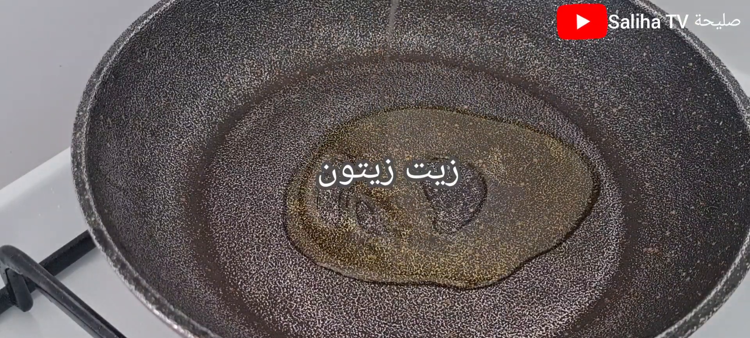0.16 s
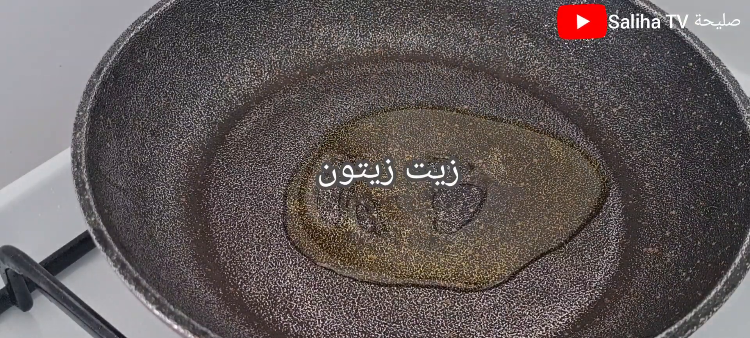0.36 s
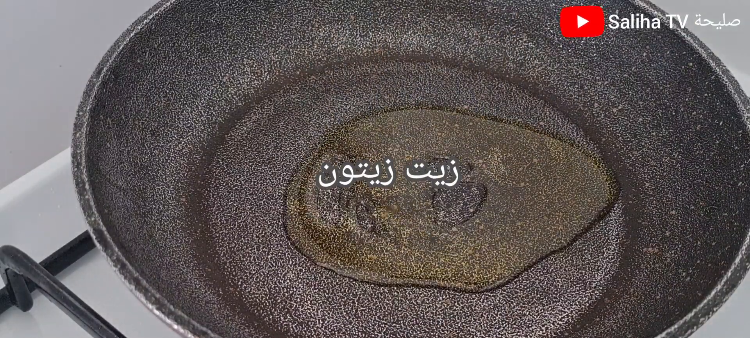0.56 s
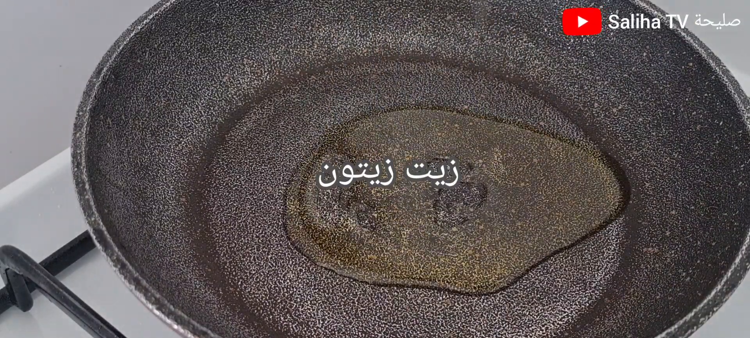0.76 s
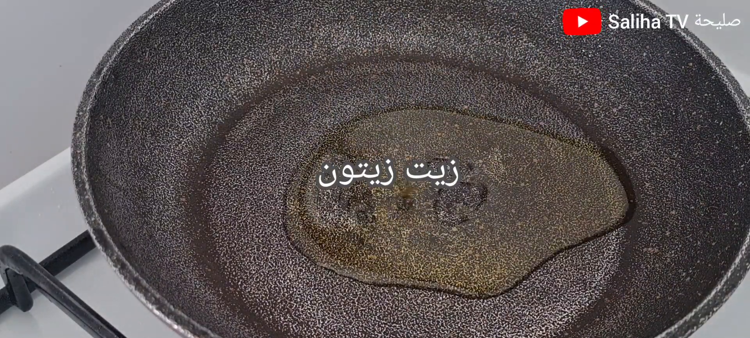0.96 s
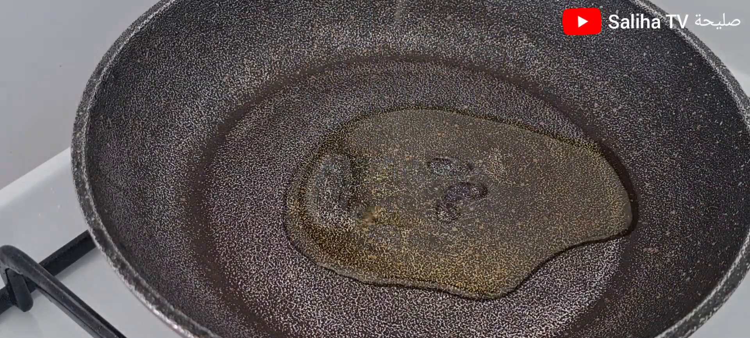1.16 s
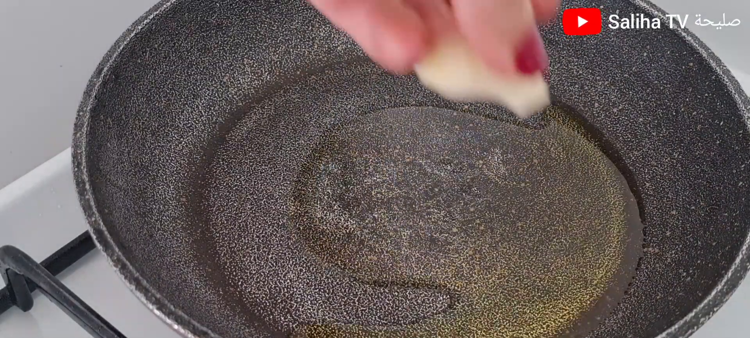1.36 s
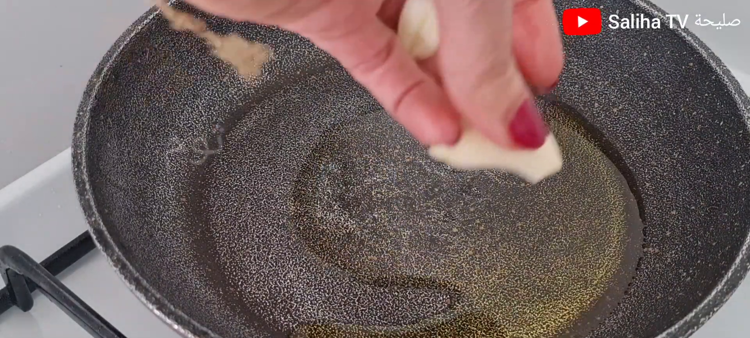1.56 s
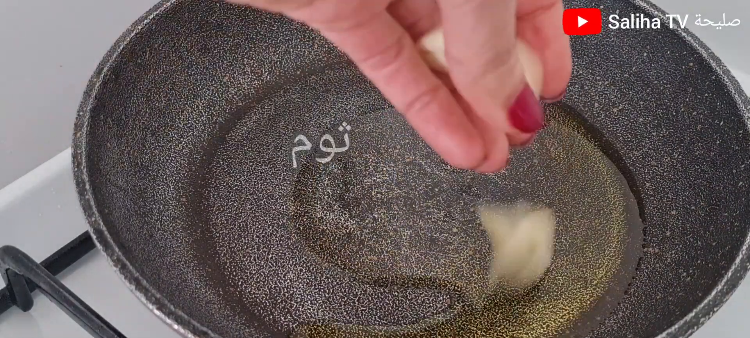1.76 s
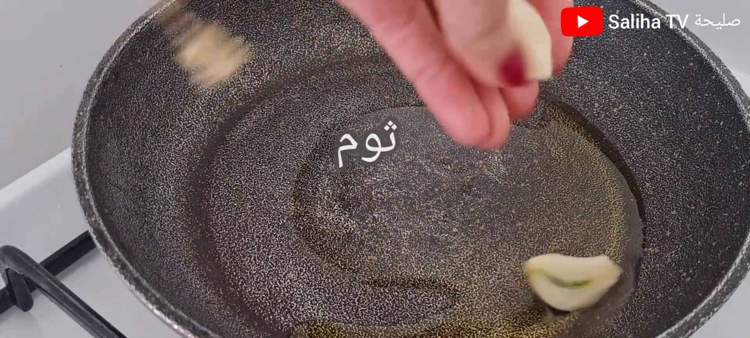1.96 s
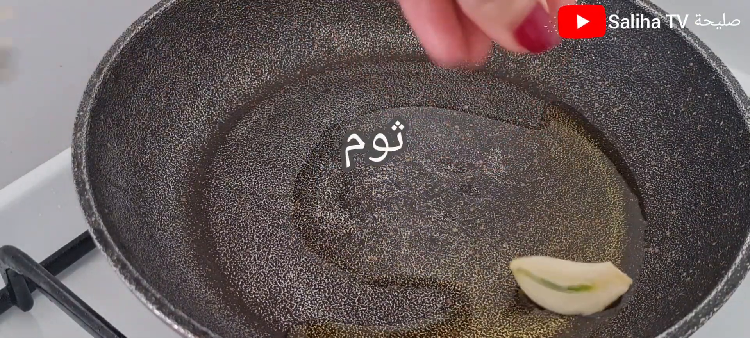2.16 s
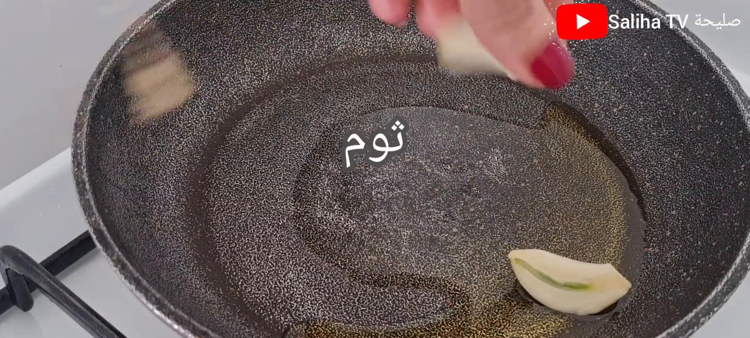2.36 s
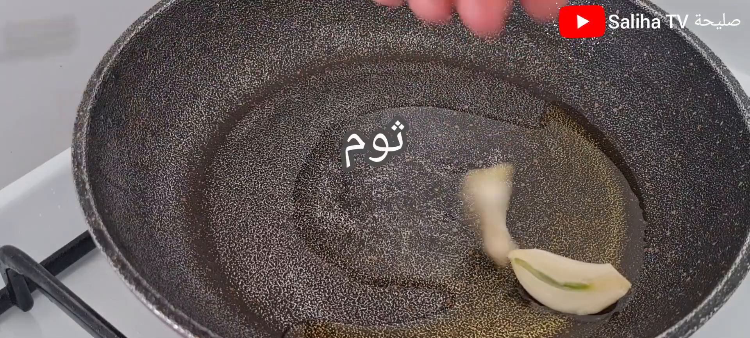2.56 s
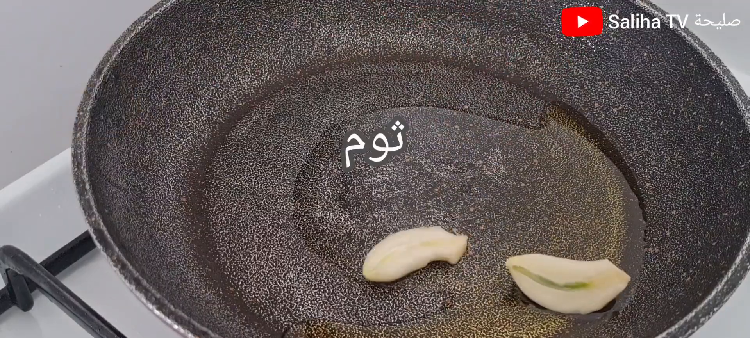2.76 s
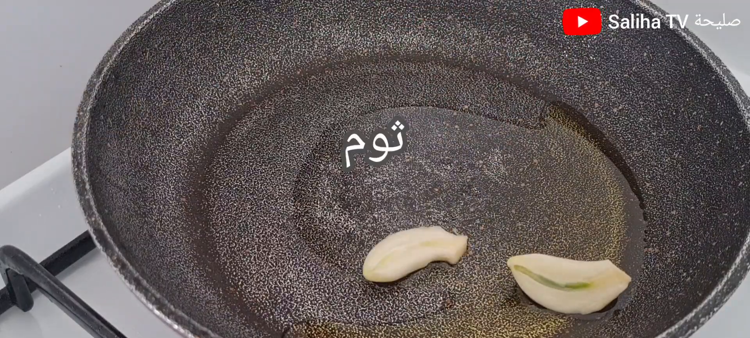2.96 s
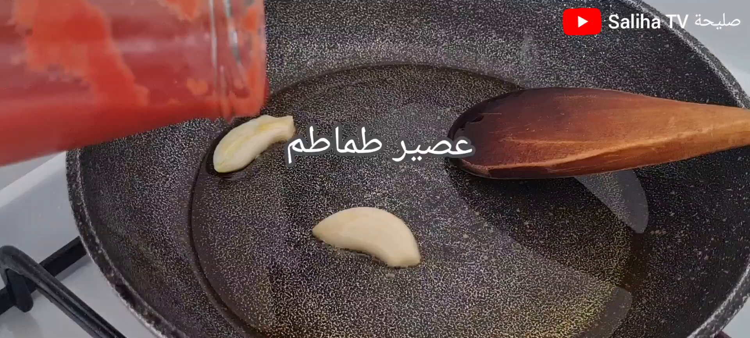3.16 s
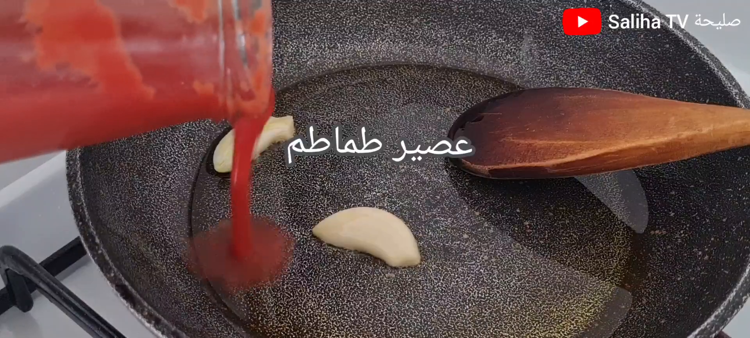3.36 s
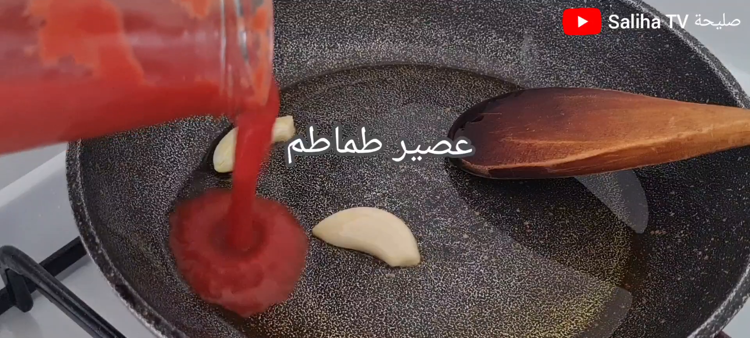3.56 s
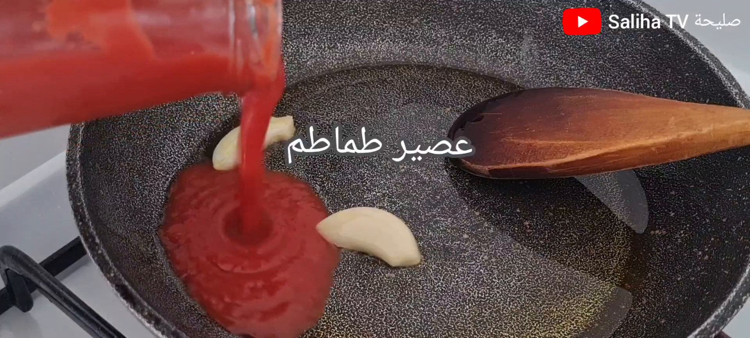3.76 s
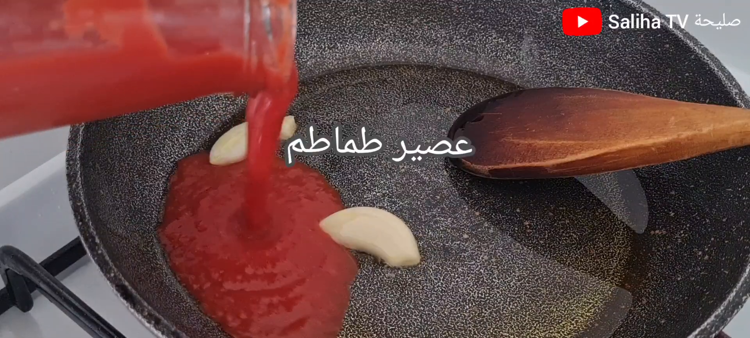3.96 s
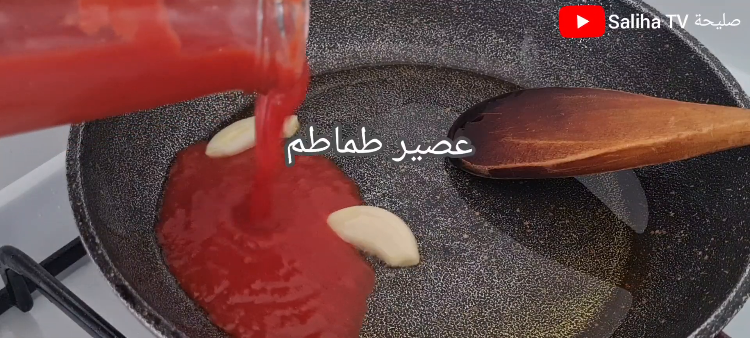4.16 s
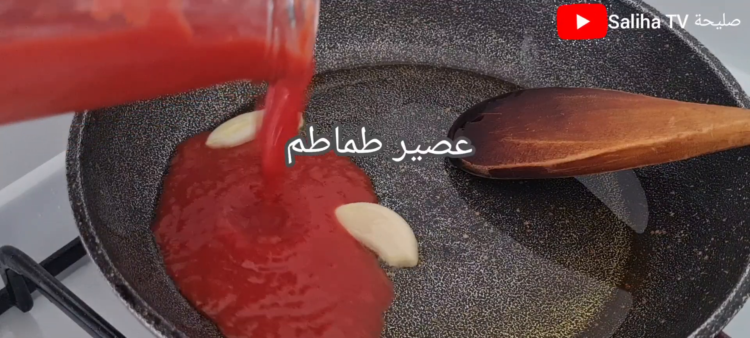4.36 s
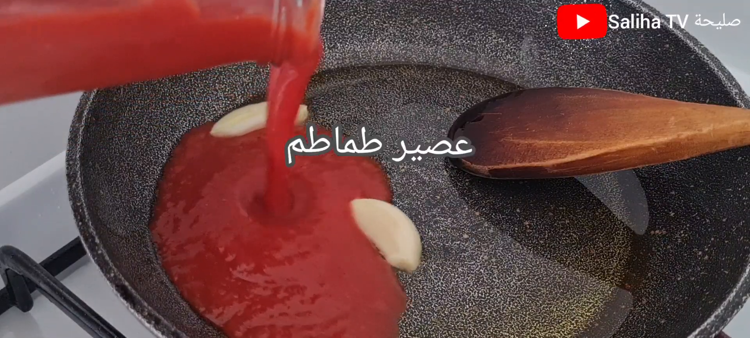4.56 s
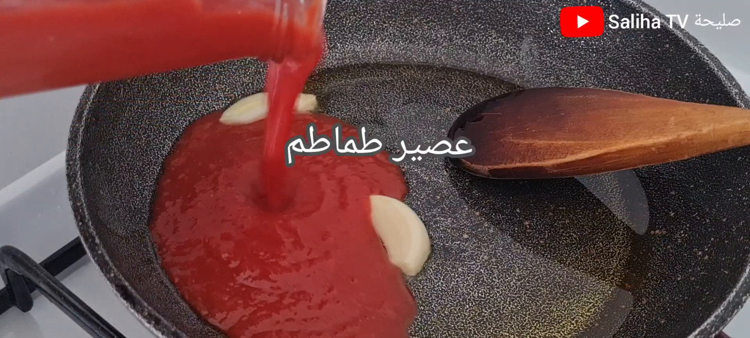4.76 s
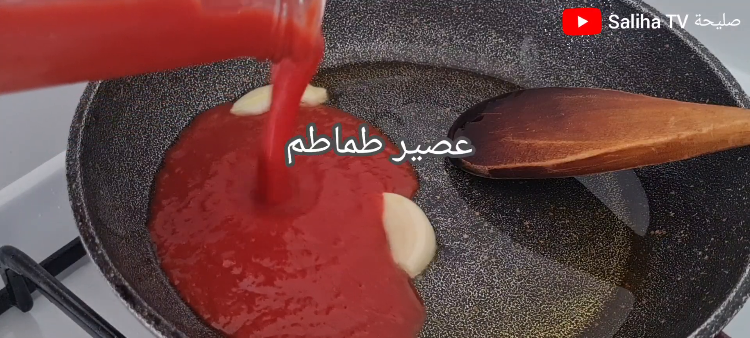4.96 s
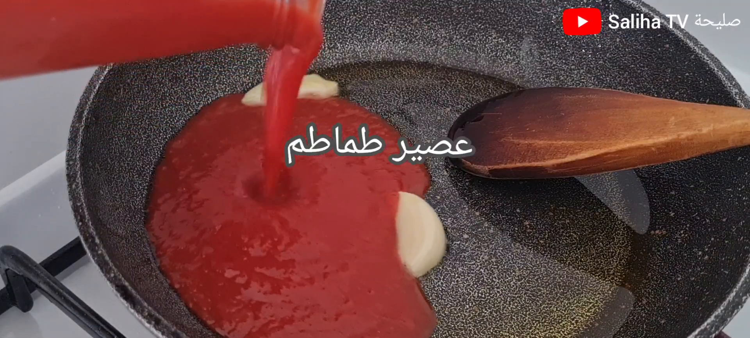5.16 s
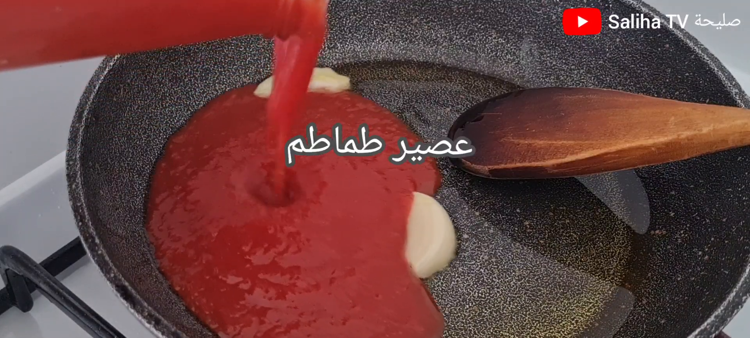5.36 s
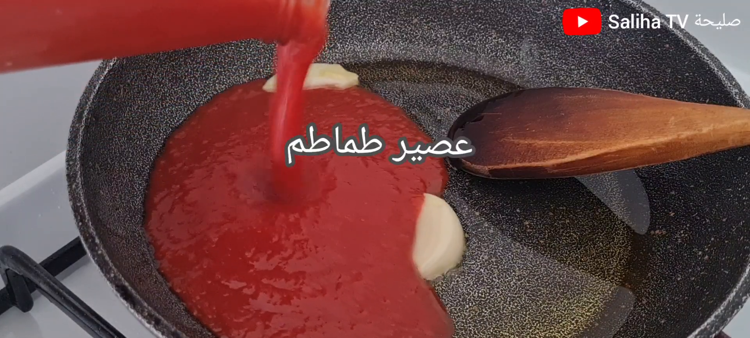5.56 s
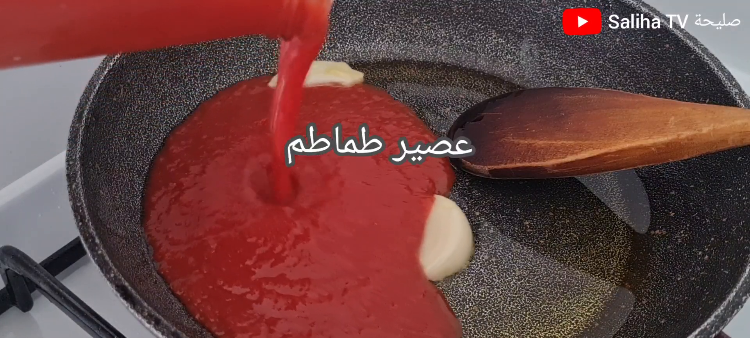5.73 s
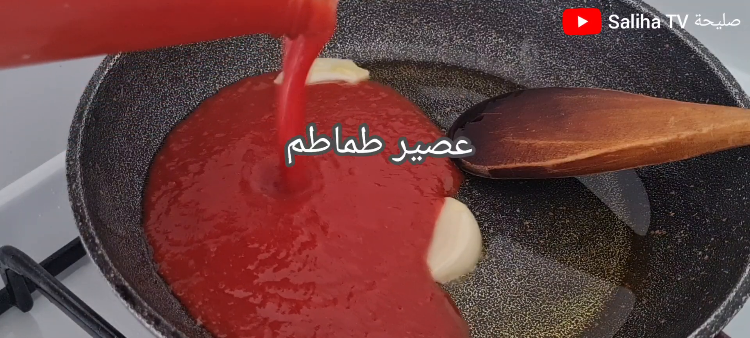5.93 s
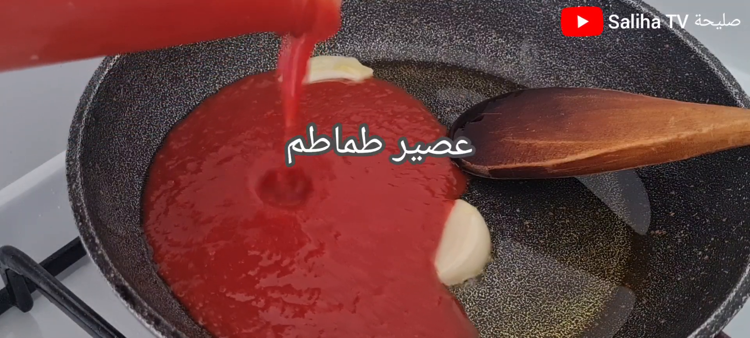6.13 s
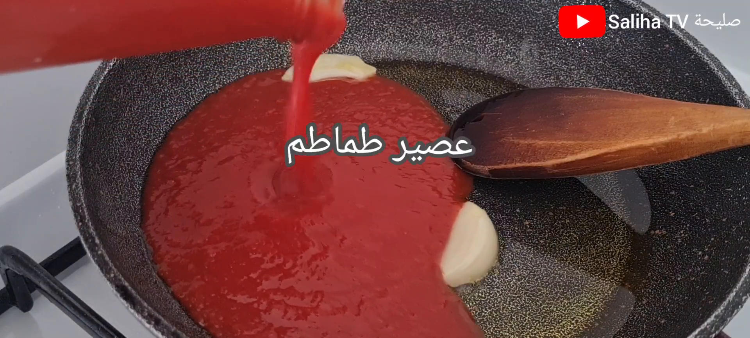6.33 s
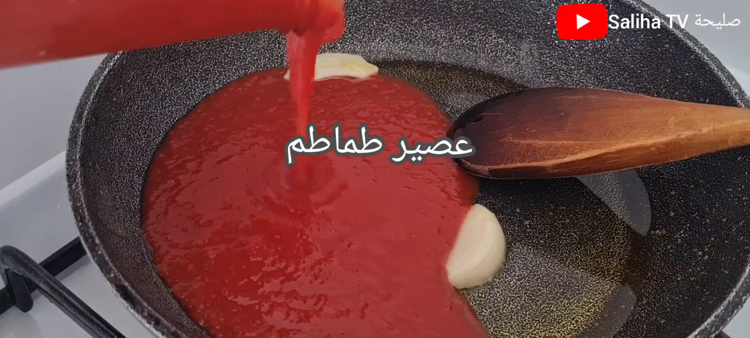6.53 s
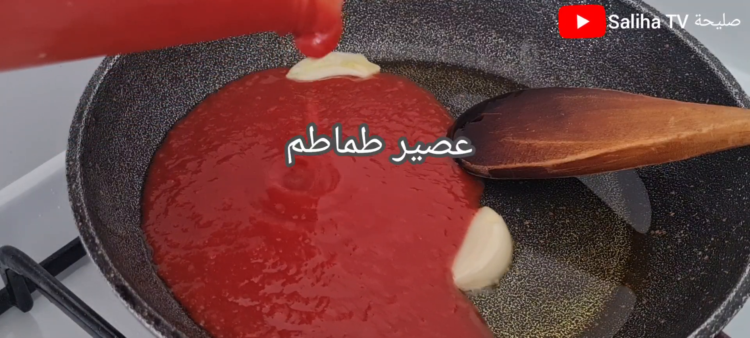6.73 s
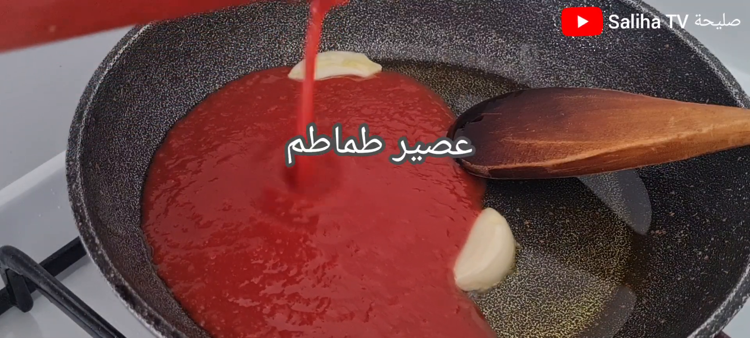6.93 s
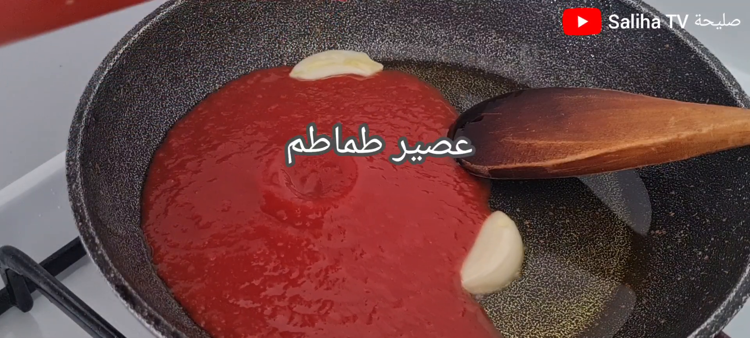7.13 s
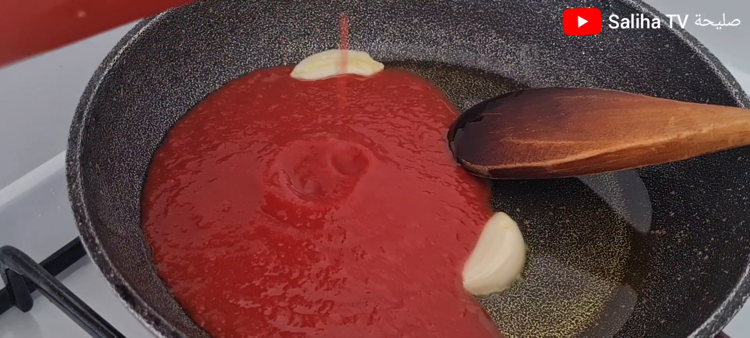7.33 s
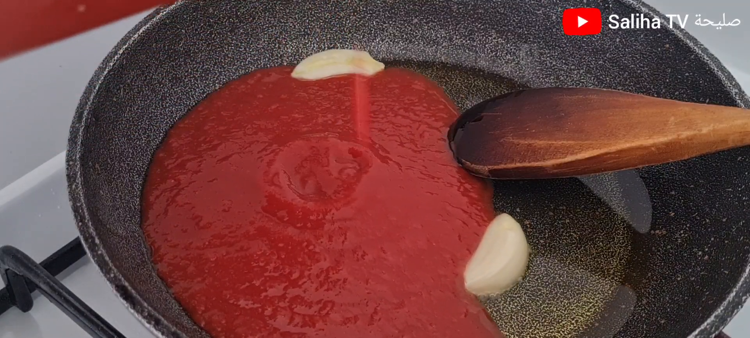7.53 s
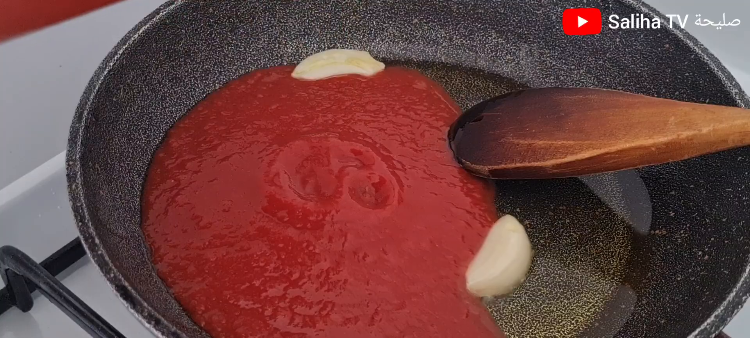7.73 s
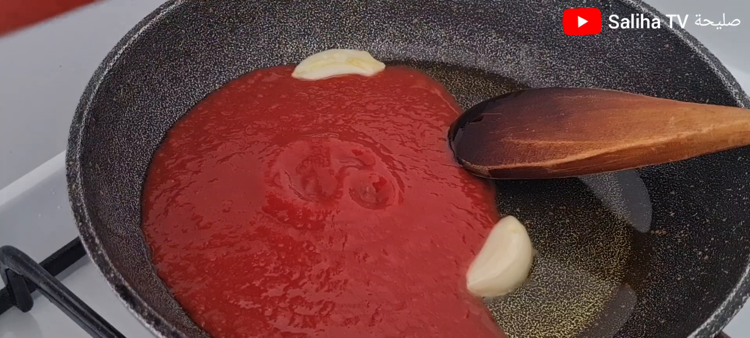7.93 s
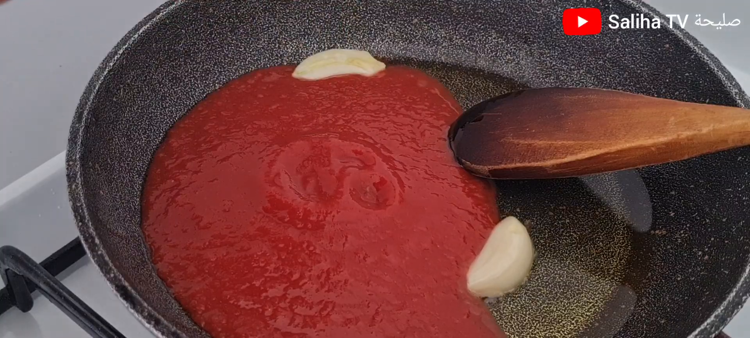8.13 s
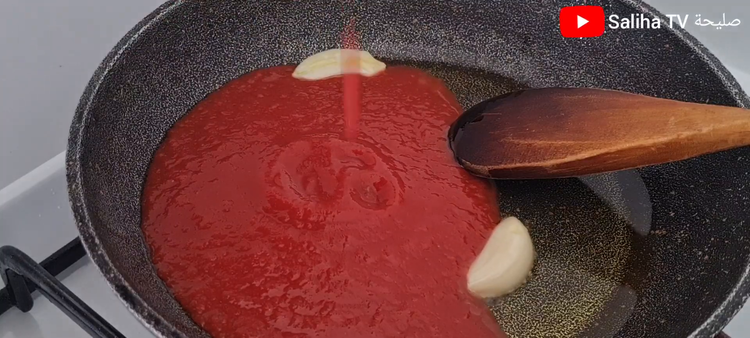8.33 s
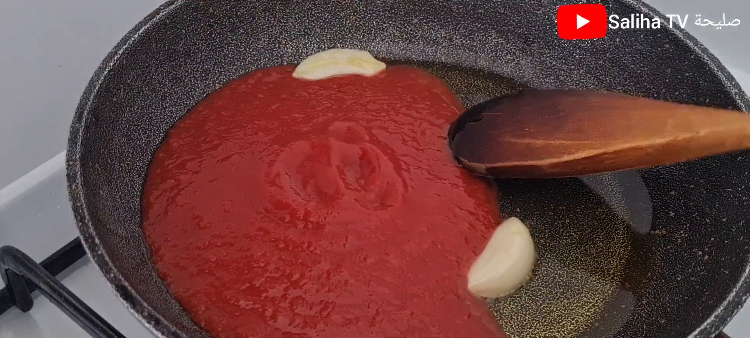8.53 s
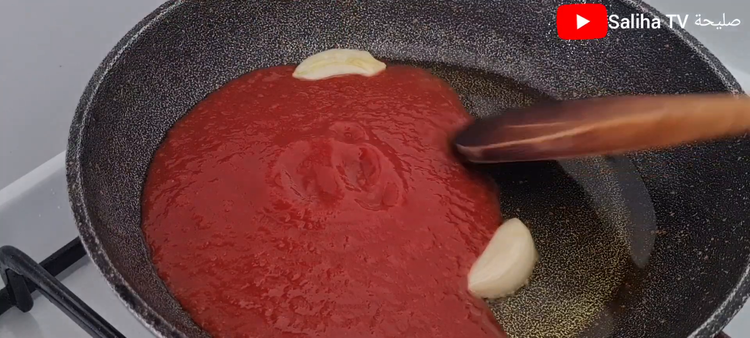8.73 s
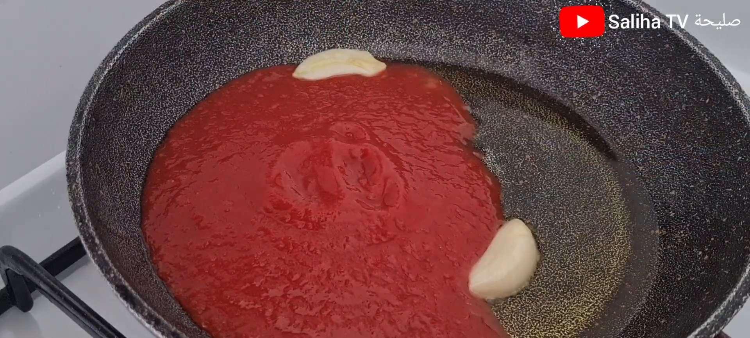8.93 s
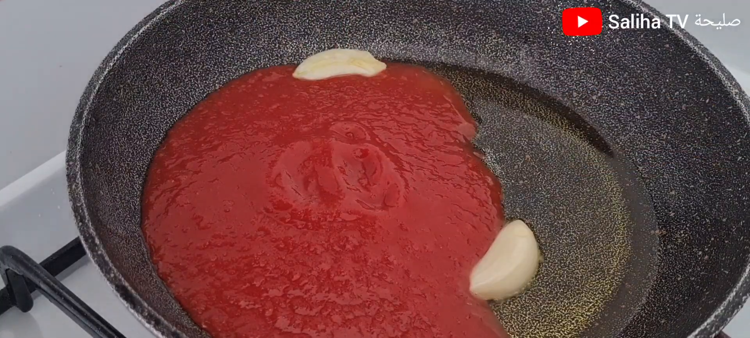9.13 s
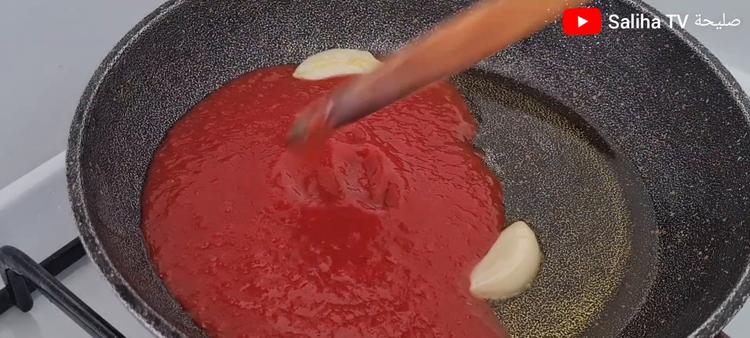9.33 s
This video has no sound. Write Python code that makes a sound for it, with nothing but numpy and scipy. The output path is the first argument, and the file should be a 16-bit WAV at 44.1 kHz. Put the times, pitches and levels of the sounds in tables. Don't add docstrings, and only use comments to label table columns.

```python
import sys
import numpy as np
from scipy import signal
from scipy.fft import rfft, irfft
from scipy.io import wavfile
from scipy.ndimage import uniform_filter1d

SR = 44100
rng = np.random.default_rng(int(sys.argv[2]) if len(sys.argv) > 2 else 0)


def gain_from_db(level_db):
    decades = np.asarray(level_db, float) / 20
    return 10 ** decades


def store_pcm(level_fs):
    pcm = np.round(np.clip(level_fs, -1, 1) * 32767).astype(np.int16)
    wavfile.write(sys.argv[1], SR, np.atleast_2d(pcm).T)


N = 418509
T = np.arange(N) / SR
EDGE_HZ = 15850

CUTS = (1.211, 3.186)
# [f/Hz, likeness 0-1]
ROOM_LIKENESS = [(60, 0.93), (180, 1), (550, 0.47), (1650, 0.08), (4970, 0.28), (15000, 0.31)]
# [t/s, bare share of the pan, bubble unevenness/dB, wall tuning factor]
COVER = [(3.3, 1.2, 2, 1.05), (3.7, 1.4, 1.5, 1.015), (4.5, 1.1, 1.7, 0.99), (5.5, 0.73, 2, 0.99),
         (6.5, 0.35, 2, 1.01), (7.5, 0.42, 3, 1.01), (9.49, 0.36, 3, 1.05)]


def evened(x):
    return x / np.sqrt(np.mean(x ** 2) + 1e-20)


def read(points, hz):
    f, value = np.transpose(points)
    return np.interp(np.log(hz + 1), np.log(f + 1), value)


def follow(rows, t):
    s, *columns = np.transpose(rows)
    return [np.interp(t, s, c) for c in columns]


def add(mix, s, sound, pan_db):
    part = mix[:, round(s * SR):][:, :sound.shape[-1]]
    part += gain_from_db(np.array([[pan_db / 2], [-pan_db / 2]])) * sound[..., :part.shape[1]]


def slow(rate_hz, size):
    width = max(int(SR / rate_hz), 1)
    noise = rng.standard_normal(size)
    return evened(uniform_filter1d(uniform_filter1d(noise, width), width))


def share(points, hz):
    gain = gain_from_db(read(points, hz)) * (hz < EDGE_HZ)
    return gain / np.sqrt(np.mean(gain ** 2))


def shaped(pair, gain, likeness, size, lead=((1, 0), (2, 0))):
    overlap = size * 3 // 4
    hz, t, z = signal.stft(pair, SR, nperseg=size, noverlap=overlap)
    like = np.clip(read(likeness, hz), -1, 1)[:, None]
    delay = np.exp(-1j * read(lead, hz))[:, None]
    right = like * delay * z[0] + np.sqrt(1 - like ** 2) * z[1]
    coloured = np.array([z[0], right]) * gain(hz[:, None], t)
    return signal.istft(coloured, SR, nperseg=size, noverlap=overlap)[1][:, :N]


def kitchen(x, t60, wet_db):
    t = np.arange(int(.6 * SR)) / SR
    sign = rng.choice([-1., 1.], (2, len(t)))
    taps = sign * (rng.random((2, len(t))) < .05) * (t > .004)
    tail = taps * gain_from_db(-60 * t / t60)
    tail /= np.linalg.norm(tail[0])
    return x + gain_from_db(wet_db) * signal.fftconvolve(x, tail, axes=1)[:, :N]


def ringing(hz, cycles, glide):
    u = np.arange(int(5 * cycles * SR / hz)) * hz / SR
    tone = np.sin(2 * np.pi * u * (1 + glide * u / cycles))
    return tone * np.exp(-u / cycles) * (1 - np.exp(-3 * u))


def fridge():
    # [multiple of shaft speed, level/dB]
    orders = [(1, -4.5), (2, -0.5), (3, -21.5), (4, -10.5), (5, -21.5), (6, -15.5)]
    # [t/s, hum level/dB, rumble level/dB]
    loudness = [(0.0, -54, -63), (7.66, -50, -57), (7.9, -49.5, -57), (9.36, -53.5, -62), (9.49, -51, -58)]
    # [t/s, f/Hz]
    shaft = [(0, 25.0), (3.18, 25.0), (3.19, 24.85), (9.49, 24.9)]
    # [f/Hz, level/dB per Hz]
    rumble_colour = [(12, -32), (20, -3), (60, -2), (157, -9.5), (203, -18), (258, -17), (431, -33),
                     (500, -29), (650, -62), (1100, -120)]
    hum_db, rumble_db = follow(loudness, T)
    turn = 2 * np.pi * np.cumsum(follow(shaft, T)[0]) / SR
    turn += 2.0 * np.searchsorted(CUTS, T)
    hum = sum(gain_from_db(db + 1.5 * slow(5, N)) * np.sin(k * turn + 6 * rng.random()) for k, db in orders)
    noise = rng.standard_normal((2, N))
    rumble = shaped(noise, lambda hz, t: share(rumble_colour, hz), ROOM_LIKENESS, size=4096)
    both = gain_from_db(hum_db) * evened(hum) + gain_from_db(rumble_db + 1.0) * rumble
    return both * gain_from_db(np.array([[-2.1], [1.7]]))


def room_tone():
    # [f/Hz, level/dB per Hz]
    air_colour = [(150, -30.5), (250, 1), (393, -19.5), (468, -17.5), (557, -13.5), (1040, -12.5),
                  (1350, -23), (1700, -18), (1950, -23), (2960, -32), (16000, -34.5)]
    # [t/s, level/dB]
    air_level = [(0.0, -75), (0.62, -76.5), (3.17, -78.5)]
    # [f/Hz, level/dB per Hz]
    oil_colour = [(180, -51), (300, -17), (392, -17), (870, -30), (978, 2), (1480, -34), (3580, -19),
                  (5080, -23), (16000, -17.5)]

    def gain(hz, t):
        air = share(air_colour, hz) * gain_from_db(follow(air_level, t)[0] + 3.5)
        oil = share(oil_colour, hz) * gain_from_db(-63.8) * (t > CUTS[1])
        return np.hypot(air, oil)

    out = shaped(rng.standard_normal((2, N)), gain, ROOM_LIKENESS, size=512)
    for s, db, decay_samples in zip(CUTS, (-66, -55), (3., 6.)):
        add(out, s, gain_from_db(db) * np.exp(-np.arange(200) / decay_samples), -3.5)
    return out


def whistle(rows):
    t = np.arange(rows[0][0], rows[-1][0], 1 / SR)
    hz, db = follow(rows, t)
    level = gain_from_db(db + 3.0 * slow(300, len(t)))
    return level * np.sin(2 * np.pi * np.cumsum(hz + 60 * slow(250, len(t))) / SR)


def birds():
    # [t/s from its start, f/Hz, level/dB]
    phrase = [(-.03, 6000, -36), (-.025, 6230, -20), (-.018, 5770, -22), (-.01, 5500, -36),
              (-.002, 4180, -38), (.002, 4630, -2), (.012, 4660, -1), (.03, 4560, -11), (.038, 4600, -22),
              (.043, 4700, 3), (.047, 4290, -27), (.051, 4870, 5.5), (.057, 5150, -17), (0.064, 4750, 3),
              (.069, 4070, -4.5), (.075, 3790, -13.5), (.115, 3800, -13), (.14, 3800, -30)]
    # [t/s, level/dB]
    song = [
        (2.2144, -81),
        (2.3944, -71),
        (2.572, -66),
        (2.7474, -64.5),
        (2.9204, -61),
        (3.091, -58.5),
    ]
    # [t/s, f/Hz, level/dB]
    lone = [
        [(3.265, 3300, -90), (3.278, 3650, -64), (3.288, 3600, -59), (3.298, 2950, -74), (3.306, 3250, -73),
         (3.327, 3550, -76), (3.333, 4650, -67), (3.35, 4600, -67), (3.375, 4700, -85)],
        [(3.24, 15200, -85), (3.254, 13500, -78), (3.268, 15300, -74), (3.275, 15400, -95), (3.295, 15300, -95),
         (3.3, 15000, -76), (3.308, 14000, -74), (3.325, 14250, -70), (3.345, 14200, -85)],
    ]
    early, late = np.zeros((2, N)), np.zeros((2, N))
    for (s, db), tune in zip(song, rng.uniform(0.98, 1.01, len(song))):
        voice = whistle(np.array(phrase) * [1, tune, 1])
        add(early, s + phrase[0][0], gain_from_db(db) * voice, -1.5)
    for rows in lone:
        add(late, rows[0][0], whistle(rows), -1.2)
    return kitchen(early, 0.33, -6.5) * (T < CUTS[1]) + late


def spoon():
    # [t/s, peak level/dB, f/Hz]
    knocks = [
        (9.069, -46.5, 404),
        (9.471, -31.5, 976),
    ]
    out = np.zeros((2, N))
    for s, db, hz in knocks:
        add(out, s, gain_from_db(db) * ringing(hz, 4.2, 0), 0)
        add(out, s, gain_from_db(db - 7) * ringing(0.297 * hz, 1.9, 0), 0)
    return out


def cloves():
    # [f/Hz, level/dB, t60/s]
    modes = [(264, -27.5, 0.57), (813, -15, .15), (987, -2, 0.099), (1035, 3.5, .1), (1042, -15.5, 0.34),
             (1086, -4.5, 0.07), (1160, -16.5, .07), (1380, -25.5, 0.059), (1950, -19.5, 0.079),
             (2042, -23.5, .09), (3250, -27.5, .07), (4100, -34, 0.057), (4960, -31, .08)]
    # [t/s, peak level/dB, overtone hardness/dB, left-right/dB]
    landings = [(1.797, -20, -26.5, 4), (1.811, -21, -22.5, 4), (1.831, -36, -26, 1), (1.883, -49, -23, 0),
                (1.908, -54, -28, 1.0), (2.495, -37.5, -24, 2), (2.516, -30.5, -28, 5.0),
                (2.534, -38.5, -33, 0), (2.564, -63, -22, 2), (2.594, -44.5, -26, 5.5),
                (2.643, -59, -18, 0), (2.734, -36, -33, 2.5)]
    # [f/Hz, level/dB per Hz]
    clatter_colour = [(760, -34), (1300, -4.5), (1980, -3.5), (2800, -19), (3210, -18.5), (5040, -26),
                      (5420, -30.5), (16000, -36.5)]
    t, out = np.arange(SR // 2) / SR, np.zeros((2, N))
    hz = np.fft.rfftfreq(len(t), 1 / SR)
    chance = rng.standard_normal((len(landings), len(modes) + len(t)))
    for (s, db, hard_db, pan_db), draw in zip(landings, chance):
        ring = np.zeros(len(t))
        for (f, mode_db, t60), vary in zip(modes, draw):
            overtone_db = (f > 1500) * (hard_db + 21)
            level = gain_from_db(mode_db + 1.5 * vary - 60 * t / t60 + overtone_db)
            ring += level * np.sin(2 * np.pi * f * t)
        ring *= 1 - np.exp(-t / 0.004)
        noise = draw[len(modes):]
        clatter = irfft(rfft(noise) * share(clatter_colour, hz), len(t))
        clatter *= gain_from_db(hard_db - 2.5 - 60 * t / .07)
        add(out, s - .002, gain_from_db(db) * (ring / abs(ring).max() + clatter), pan_db)
    return kitchen(out, 0.33, -7)


def spits():
    # [t/s, peak level/dB, f/Hz, spray level/dB, left-right/dB]
    cracks = [(7.3267, -8.5, 12200, -21, -2), (7.4807, -25, 8910, -17, 0.5), (7.5261, -38, 7970, -16.5, -4),
              (7.5934, -23, 12900, -10, -5), (7.7027, -34, 7370, -16, -3), (7.8179, -40, 12400, -12, 3.0),
              (7.8578, -35, 7680, -14, 3), (7.9047, -32, 8110, -11, -2.5), (7.928, -18, 11000, -15, 0),
              (8.0973, -35, 11900, -17, -3), (8.1123, -25, 6970, -14.5, -4),
              (8.1367, -23.5, 8150, -11.5, -6), (8.217, -15.5, 14300, -12, 4),
              (8.2993, -25, 12000, -17, -5), (8.3422, -22, 11100, -16, -0.5),
              (8.4201, -39, 7240, -15, -1.0), (8.4505, -39, 11500, -17, -3), (8.5079, -26, 8130, -13, -5),
              (8.5574, -19.5, 7430, -10.5, -3), (8.5762, -28, 12000, -12, 1), (8.6336, -38, 7170, -16, 1),
              (8.6465, -30, 8470, -14, -5), (8.6765, -38, 8920, -14, -1.0), (8.7239, -22, 12100, -10, -2.5),
              (8.756, -28, 7440, -9, 0.5), (8.8102, -31, 11800, -9, 0), (8.864, -23, 12000, -14, -4),
              (8.8805, -33, 7520, -14, -2.5), (8.9239, -31, 11300, -19, -4), (8.9533, -27, 11400, -9, 1.0),
              (9.1182, -19, 11600, -15.5, 1.0), (9.1659, -41, 10600, -17, 0.5),
              (9.1838, -23.5, 11500, -9, 3), (9.2726, -26, 12000, -9, 3.5), (9.3305, -31, 9920, -12, 1.0),
              (9.3589, -29, 12700, -14, -1), (9.4053, -36, 6790, -10, -3), (9.475, -34, 11600, -14, -0.5)]
    out, t = np.zeros((2, N)), np.arange(3000) / SR
    for s, db, hz, spray_db, pan_db in cracks:
        add(out, s + .001, gain_from_db(db) * ringing(hz, 2.4, 0.016), pan_db)
        treble = signal.butter(2, 0.64 * hz, "high", fs=SR)
        spray = signal.lfilter(*treble, rng.standard_normal((2, 3000)))
        add(out, s + 0.0009, spray * gain_from_db(db + spray_db - 60 * t / 0.1), pan_db)
    return out


def big_bubbles():
    # [t/s, level/dB, f/Hz]
    plops = [(4.7507, -24, 2900), (5.1155, -30, 1660), (5.7157, -26, 2160), (5.7431, -21, 2200),
             (6.02, -20, 2140), (6.4166, -21, 2320), (6.4855, -23, 1940), (6.5883, -23, 1910),
             (6.698, -28, 1700), (6.7299, -30, 1860), (6.8376, -25, 1810), (6.9718, -22, 1450),
             (7.124, -31, 1800), (7.1484, -26, 1380), (7.4018, -25, 2150), (7.6005, -24.5, 1400),
             (7.6768, -26, 1760), (7.7979, -19.5, 1850), (7.8266, -27, 1810), (7.8622, -23, 1800),
             (7.9017, -27, 1740), (7.9212, -23, 1820), (8.0723, -31, 1810), (8.1097, -28, 1880),
             (8.137, -30, 1830), (8.1916, -31, 1770), (8.4111, -42, 1910), (8.881, -30, 2260),
             (8.9808, -34, 1880), (9.1893, -31, 1820)]
    out = np.zeros((2, N))
    for s, db, hz in plops:
        add(out, s, gain_from_db(db + 0.5) * ringing(hz, 4.5, 0.029), .8)
    return out


def pan_base():
    # [t/s, level/dB, f/Hz, damping by the sauce 0-1]
    base = [(3.2, -69, 1035, 0), (3.5, -69.5, 1030, 0), (3.8, -60, 1023, 0.02), (4.15, -50.5, 997, 0),
            (4.6, -48, 968, 0.03), (5.1, -52, 948, 0.4), (5.6, -53, 900, 0.3), (6.1, -56.5, 846, 0.3),
            (7.0, -60.5, 824, .8)]
    db, hz, damping = follow(base, T)
    turn = np.exp(2j * np.pi * np.cumsum(hz) / SR)
    drive = rng.standard_normal((2, N))
    drive[1] = 0.67 * drive[0] + 0.54 * drive[1]

    def resonance(width_hz):
        pole = [1, -np.exp(-np.pi * width_hz / SR)]
        moved = signal.lfilter([1], np.convolve(pole, pole), drive / turn)
        return evened((turn * moved).real)

    blur = np.clip(damping, 0, 1)
    gate = np.clip((T - CUTS[1]) / .03, 0, 1) * np.clip((7.8 - T) / 0.44, 0, 1)
    return gain_from_db(db) * gate * (np.sqrt(1 - blur) * resonance(55) + np.sqrt(blur) * resonance(170))


def bursts(per_s, tail_ms):
    uneven_db = follow(COVER, T)[1]
    size = gain_from_db(uneven_db * np.minimum(rng.exponential(1, (2, N)), 6))
    size *= rng.random((2, N)) < per_s / SR
    size = 0.67 * size + 0.36 * size.mean(0)
    keep = np.exp(-1000 / (tail_ms * SR))
    power = signal.lfilter([1 - keep], [1, -keep], size ** 2)
    usual = uniform_filter1d(power, size=SR // 4) + 1e-9
    return rng.standard_normal((2, N)) * np.sqrt(power / usual)


def boiling():
    # [t/s, fine steam level/dB, small bubbles level/dB, large bubbles level/dB]
    boil = [(3.34, -75, -75, -80), (3.41, -63, -96, -79), (3.46, -46.5, -61.5, -81), (3.72, -34, -44, -65),
            (4.01, -35.5, -38, -49), (5.58, -44, -34.5, -35.5), (6.44, -49, -40, -33.5),
            (7.31, -49.5, -43, -36), (7.33, -46, -40, -38.5), (7.36, -49.5, -41.5, -35),
            (8.03, -52.5, -46.5, -36), (8.15, -47.5, -44, -35.5), (9.49, -57.5, -49, -41.5)]
    # [f/Hz, level/dB per Hz]
    steam_colour = [(2500, -44), (5000, -6.5), (8000, 2.5), (10500, -5.5), (12500, -3.5), (15500, -19)]
    # [f/Hz, level/dB per Hz]
    small_colour = [(1500, -28.5), (2600, -4), (3300, 0.5), (4500, -2.5), (6000, -8.5), (9000, -24.5)]
    # [f/Hz, level/dB per Hz]
    large_colour = [(180, -30), (280, -20.5), (550, -21.5), (1000, -12), (1250, -10.5), (1450, -1.5),
                    (2300, -2), (2900, -8.5), (5000, -26.5)]
    # [f/Hz, width/Hz, level/dB]
    wall = [(1450, 100, -0.5), (1760, 123, 9), (2150, 98, 6), (2978, 89, 8), (3930, 110, 1), (4535, 68, 12),
            (5260, 86, 9.5), (6270, 130, 6.5), (7030, 150, 8), (7860, 150, 3)]
    # [f/Hz, left-right/dB]
    lean_colour = [(60, -3.5), (180, 4), (550, -4), (1650, 0.5), (4970, -2), (15000, 1.5)]
    # [t/s, left-right/dB]
    drift = [(3.3, 1), (4.14, -1), (9.49, 1)]
    # [f/Hz, likeness 0-1]
    pan_likeness = [(250, .88), (700, 0.63), (1500, 0.48), (3000, 0.4), (7000, 0.32), (15000, 0.22)]
    # [f/Hz, phase/rad]
    left_lead = [(0, -0.5), (2500, -0.02), (4130, 0.78), (5600, -5), (7750, -2.5), (10200, -2.5),
                 (12500, 7), (16500, 11)]

    def layer(k, points, surge_db, per_s, tail_ms, size):
        def gain(hz, t):
            bare, _, tuning = follow(COVER, t)
            ring = sum(db * bare / (1 + (2 * (hz - f * tuning) / width) ** 2) for f, width, db in wall)
            patches = uniform_filter1d(rng.standard_normal(ring.shape), size=9, axis=0)
            patches = uniform_filter1d(patches, size=10)
            surges = uniform_filter1d(rng.standard_normal(len(t)), size=5)
            lean = (read(lean_colour, hz) + follow(drift, t)[0]) * np.array([.5, -.5])[:, None, None]
            level = follow(boil, t)[k] + 1.18 * evened(patches) + surge_db * evened(surges)
            return share(points, hz) * gain_from_db(level + ring + lean) * (t > boil[0][0])

        return shaped(bursts(per_s, tail_ms), gain, pan_likeness, size, left_lead)

    steam = layer(0, steam_colour, 0.66, per_s=3000, tail_ms=1.2, size=512)
    small = layer(1, small_colour, 0.59, per_s=1500, tail_ms=1.9, size=1024)
    large = layer(2, large_colour, 0.44, per_s=900, tail_ms=2.25, size=1024)
    return steam + small + large


def scene():
    background = fridge() + room_tone() + birds()
    return background + spoon() + cloves() + spits() + big_bubbles() + pan_base() + boiling()


def low_pass(x):
    return signal.sosfilt(signal.butter(12, 16840, fs=SR, output="sos"), x)


def record(dry):
    lowpass = signal.firwin(255, EDGE_HZ + 100, window=("kaiser", 7), fs=SR)
    limited = signal.oaconvolve(dry, lowpass[None], "same")
    return low_pass(limited)


dry = scene()
out = record(dry)
store_pcm(out)
```